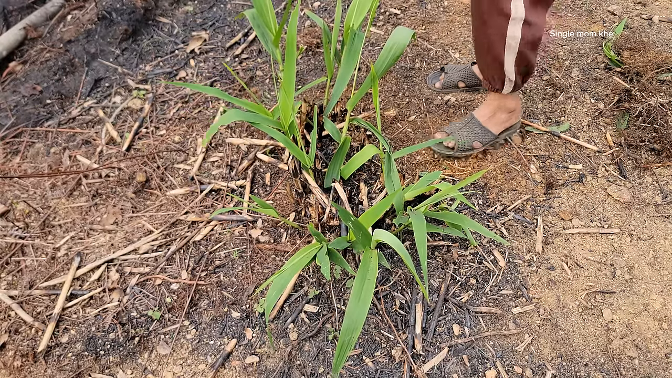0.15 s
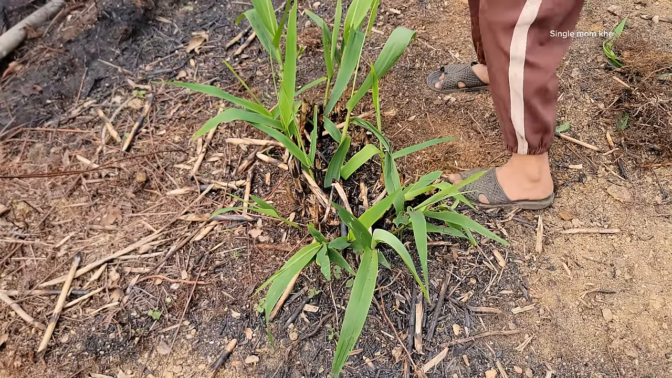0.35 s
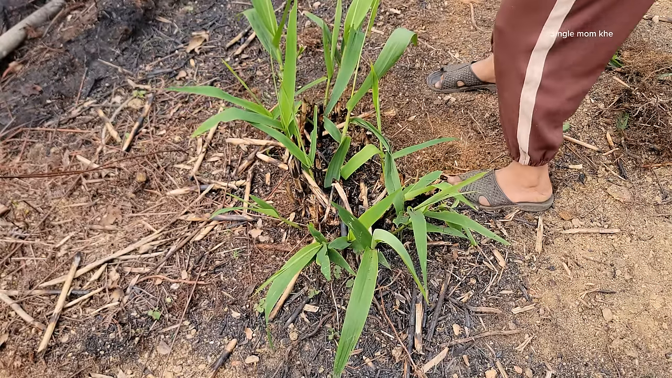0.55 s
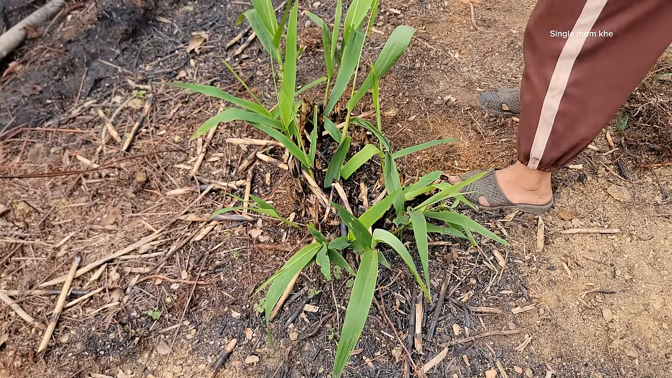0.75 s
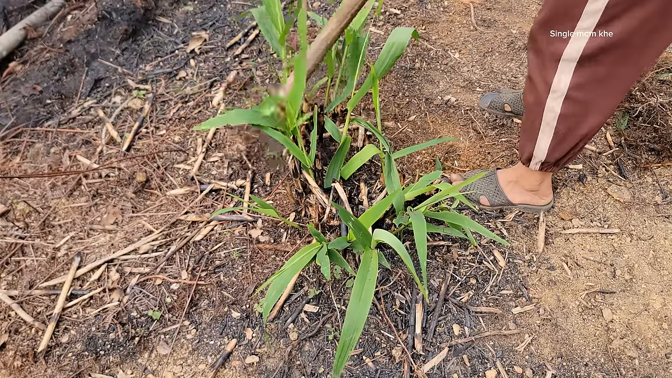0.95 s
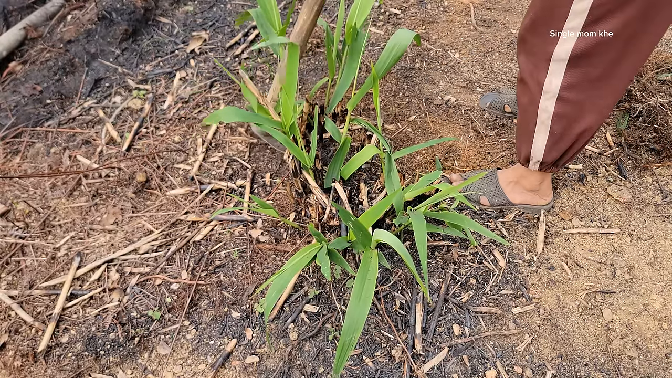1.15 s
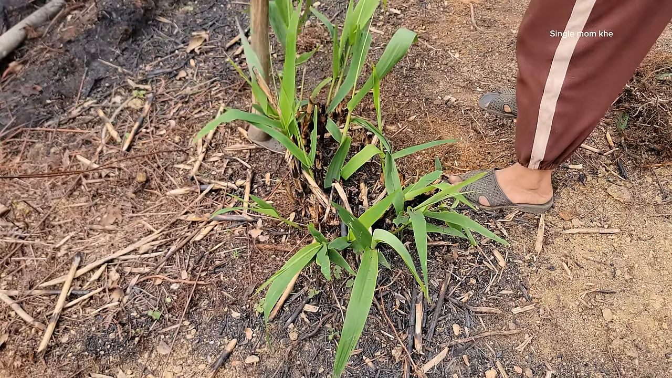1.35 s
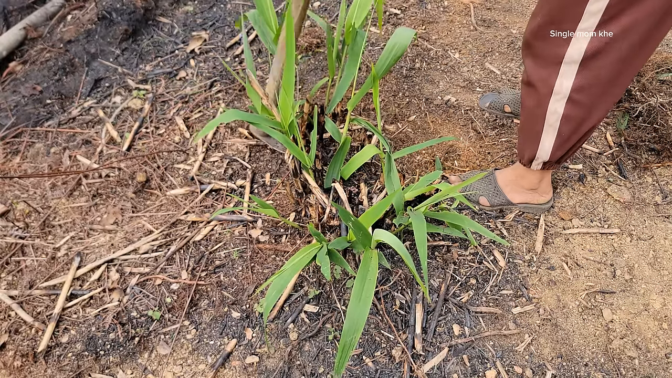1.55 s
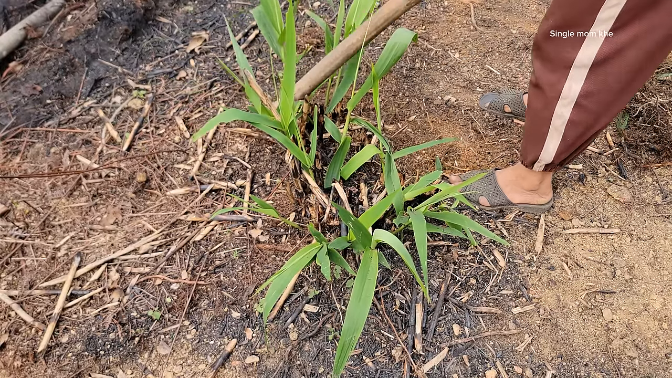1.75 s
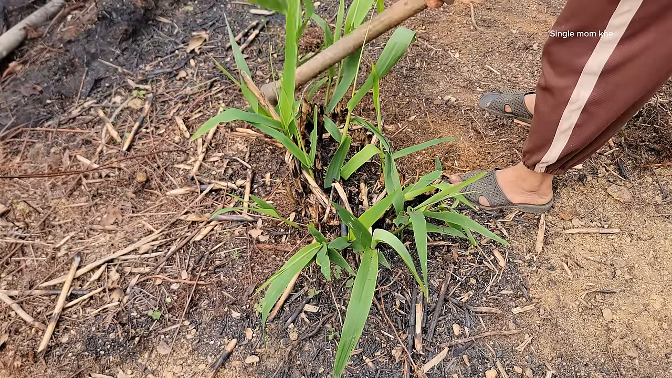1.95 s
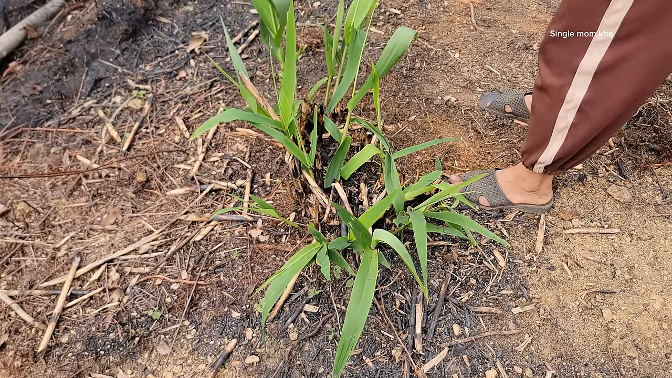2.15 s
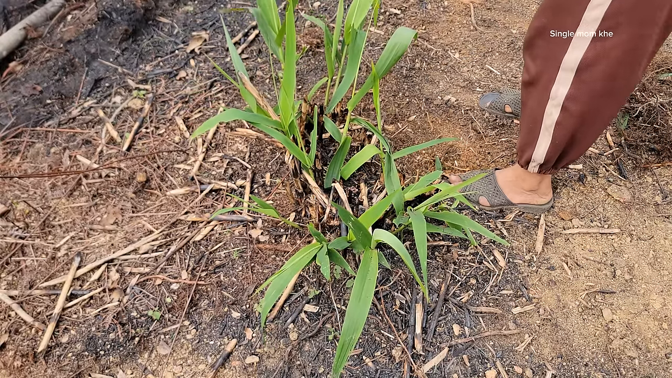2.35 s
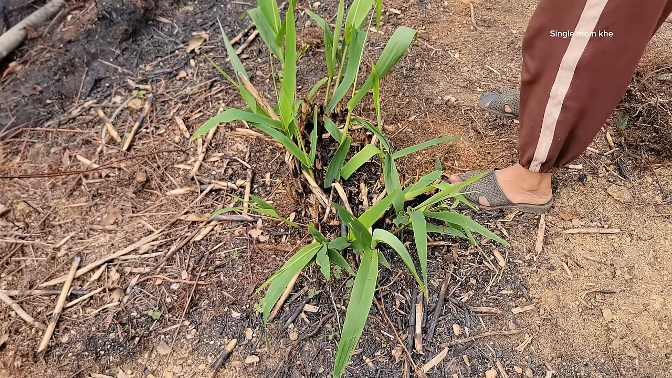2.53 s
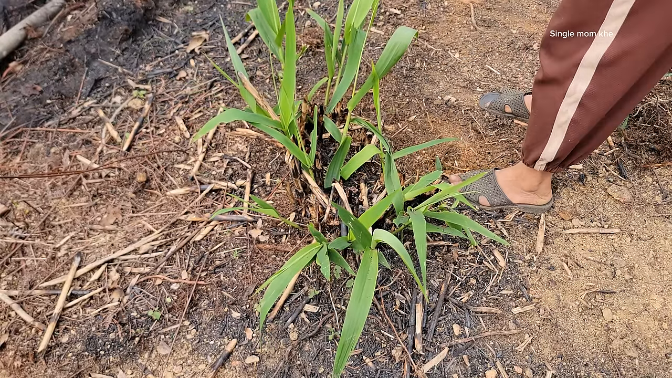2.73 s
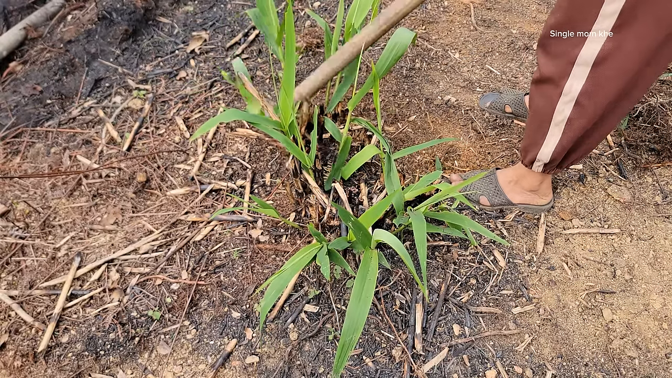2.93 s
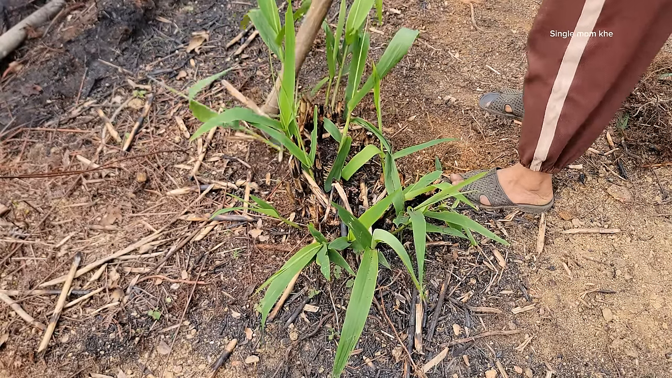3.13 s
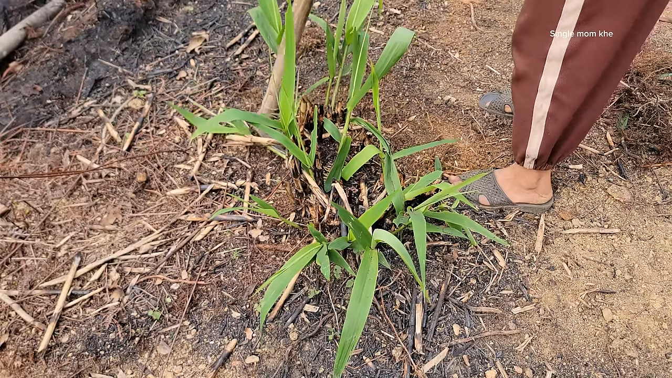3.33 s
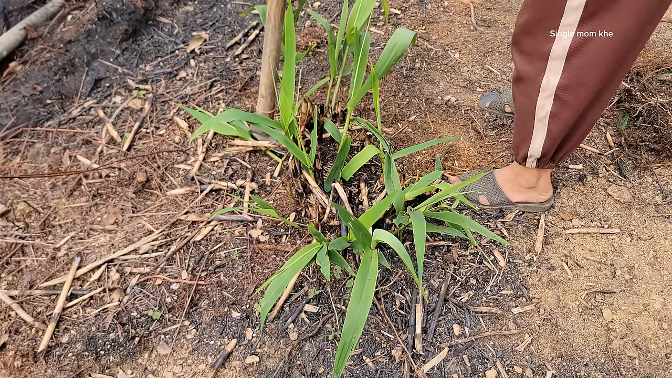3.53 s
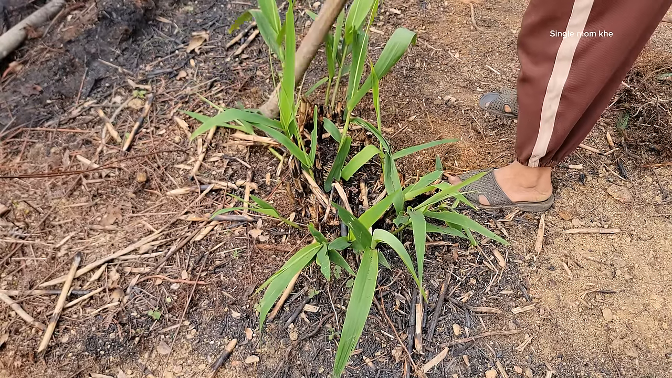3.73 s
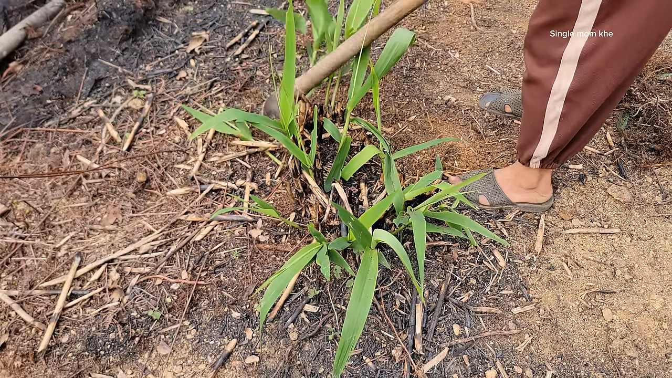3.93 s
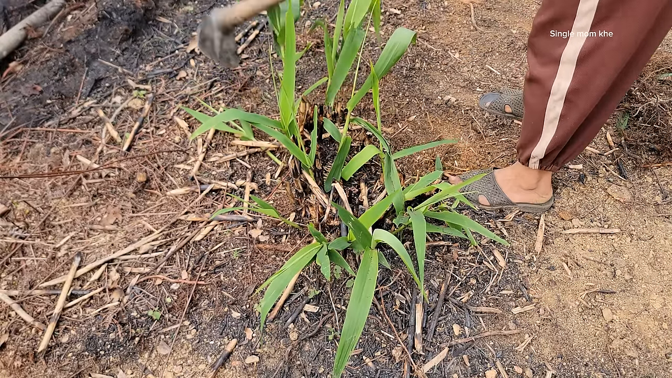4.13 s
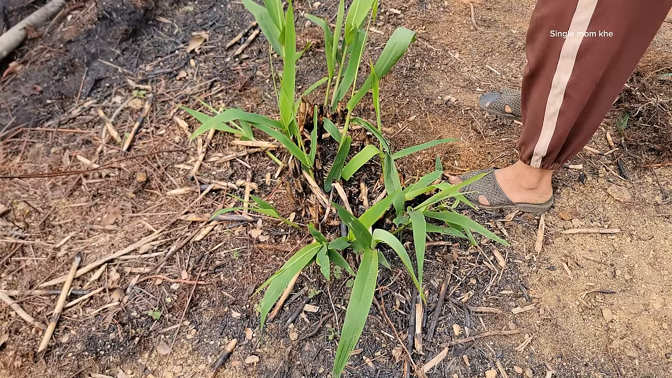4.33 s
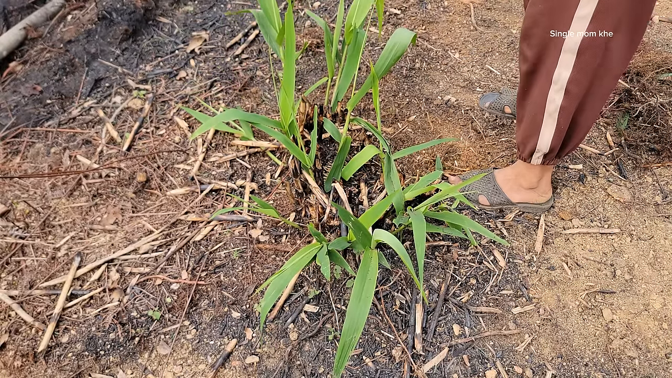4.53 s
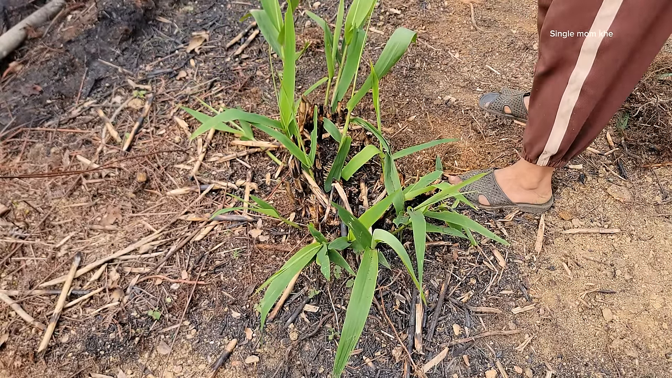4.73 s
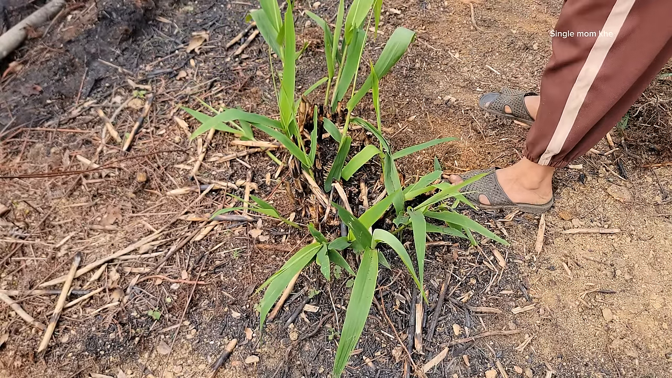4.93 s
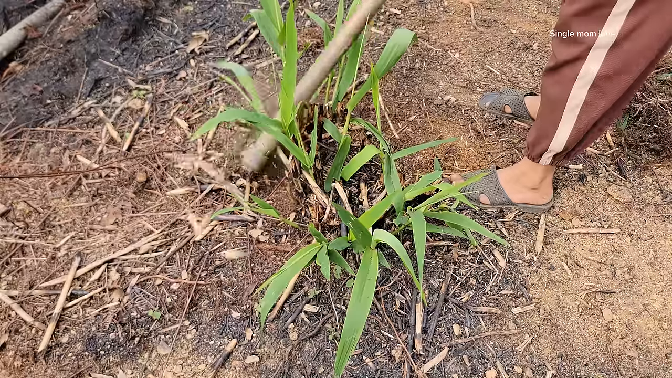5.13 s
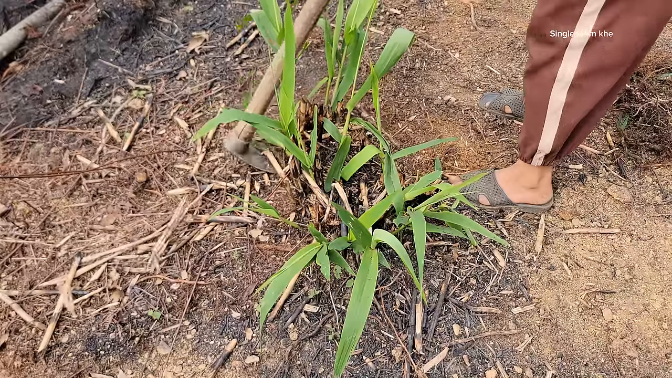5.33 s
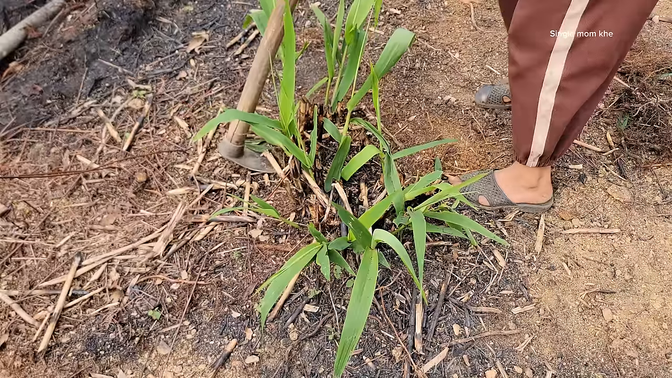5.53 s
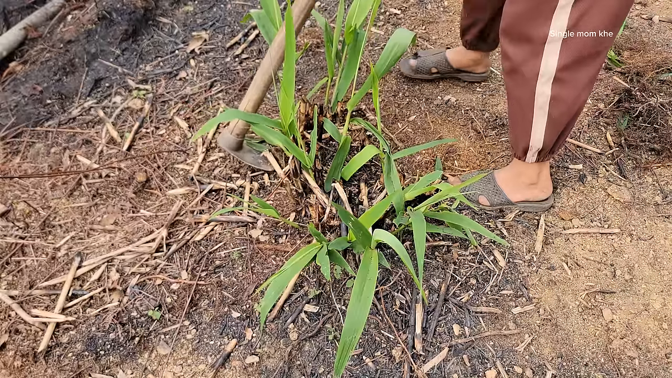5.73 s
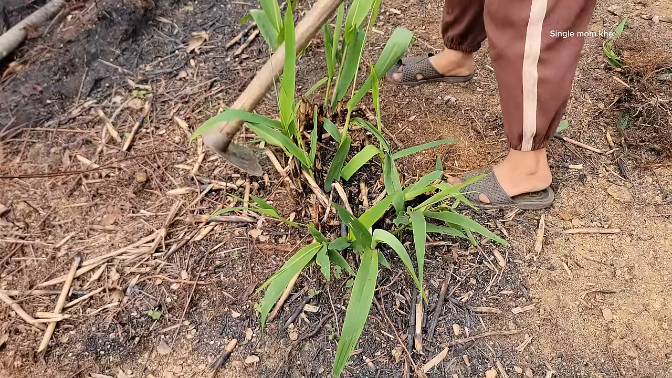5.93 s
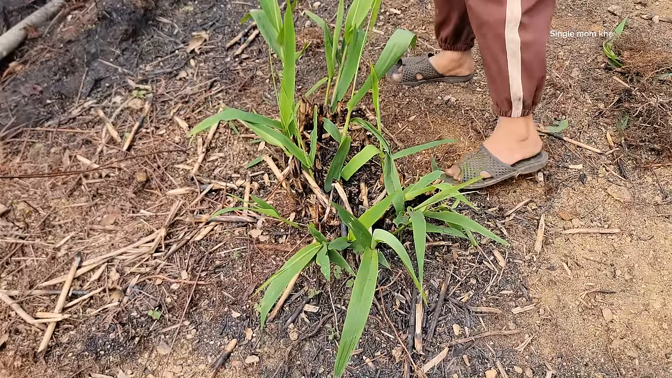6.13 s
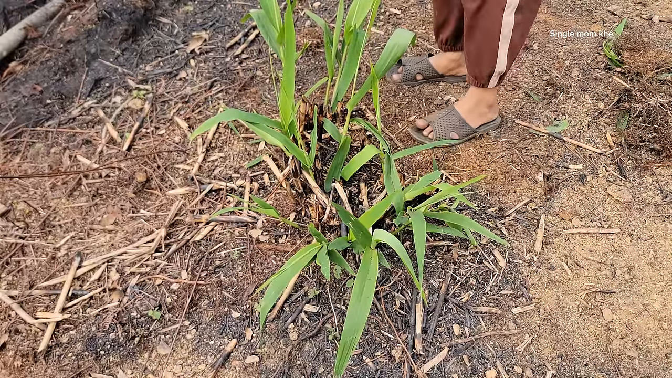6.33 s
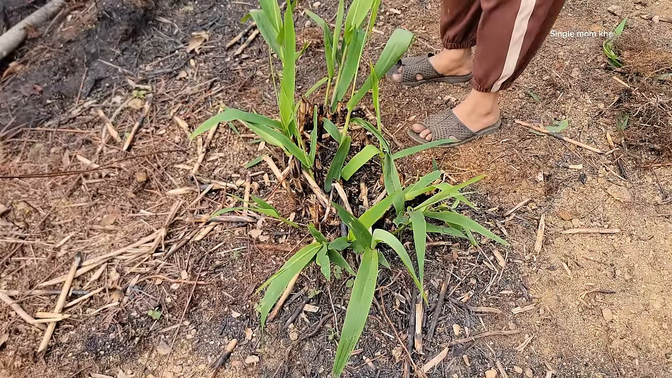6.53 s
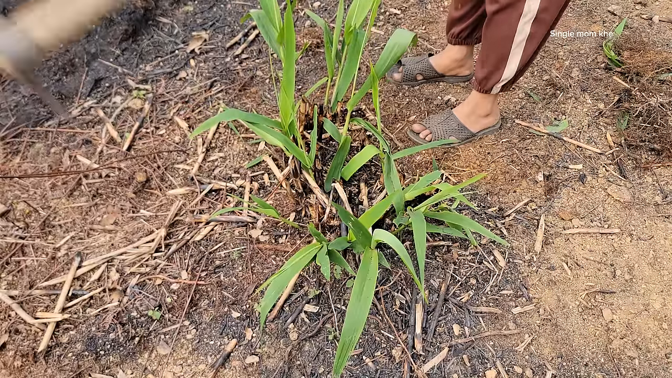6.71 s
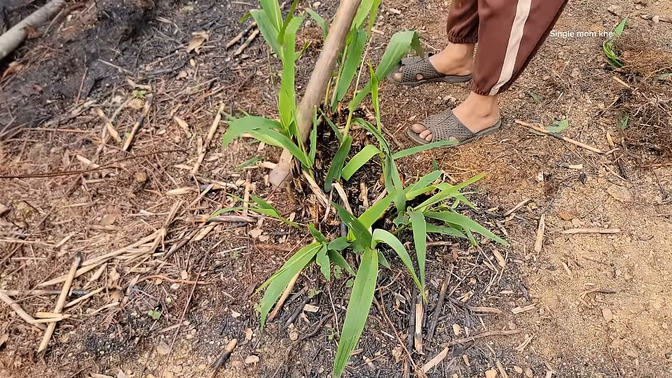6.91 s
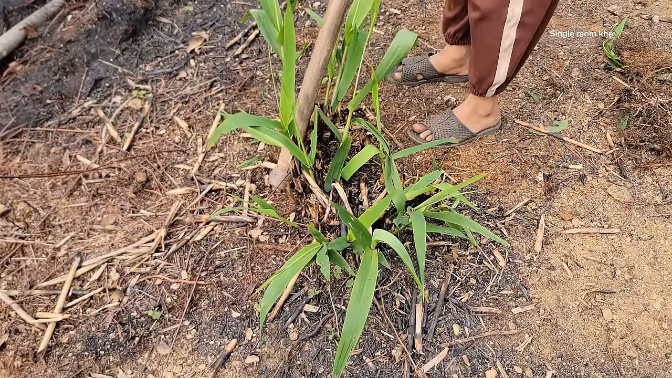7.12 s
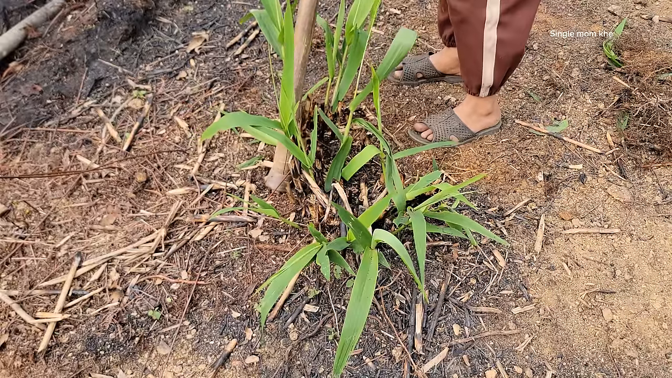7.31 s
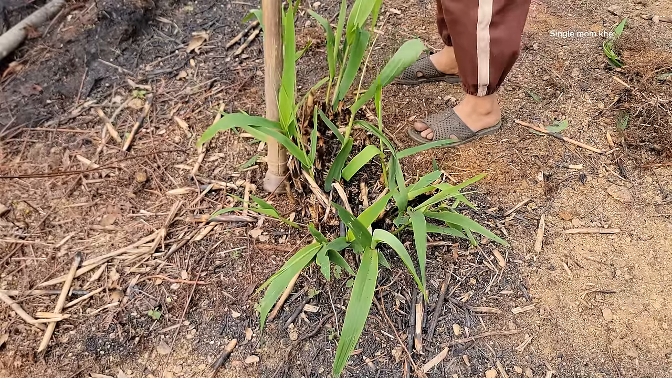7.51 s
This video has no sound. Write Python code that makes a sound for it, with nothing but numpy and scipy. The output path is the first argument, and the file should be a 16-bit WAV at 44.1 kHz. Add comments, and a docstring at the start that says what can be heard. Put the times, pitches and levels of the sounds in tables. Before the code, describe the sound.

Four crunchy, thudding hoe strikes in dry earth, with light scraping between them, over faint swelling cicadas and distant birds.

```python
"""Hoeing dry garden soil

A hoe chops four times into dry soil and is dragged back through crumbs and leaves. Each chop is
a crunch of breaking grit over a dull thud; between chops, clods tick and sandals scuff.
Cicadas click so fast that they buzz, in long swells that each climb from a lower note.
Small birds chirp far off, over a low hum and a light breeze."""
import sys
import numpy as np
from scipy import signal
from scipy.fft import rfft, irfft, next_fast_len
from scipy.io import wavfile
from scipy.ndimage import uniform_filter1d

SR = 44100
rng = np.random.default_rng(int(sys.argv[2]) if len(sys.argv) > 2 else 0)


def generate_wav(sig):
    """Save sig (samples, or channels by samples) to the path in sys.argv[1] as 16-bit PCM at SR."""
    pcm = np.round(np.clip(np.atleast_2d(sig).T, -1, 1) * 32767).astype(np.int16)
    wavfile.write(sys.argv[1], SR, pcm)


N = 333837
TIME = np.arange(N) / SR

# The tone of coarse crumbs of soil. Each row: frequency in Hz, relative level in dB.
CRUMB_TONE = [(250, -24), (550, -14), (800, -10.5), (1250, -2.5), (2200, -4.5), (3200, -1), (4500, -5.5),
              (7000, -12.5), (12000, -30), (16000, -38)]
# Soil thrown up by each chop. Each row: time in seconds, relative dB of crumbs, relative dB of dust.
THROWN_SOIL = [(.835, -52.5, -52), (2.93, -58, -60), (5.01, -53, -54), (6.78, -57, -57.5)]


def chops():
    """The blade bites several times in quick succession to make one chop, each in its own patch of earth."""
    # The blade biting the soil. Each row: peak time in seconds, level in dB, rise and decay in seconds,
    # treble tilt in dB per octave, pebble pitch in Hz, pebble level in dB relative to the grit.
    bites = [(0.8293, -9.5, .0004, 0.0014, -0.8, 3900, -9), (0.8358, -10, 0.0036, 0.001, -0.2, 2800, -11),
             (0.8395, -11.5, 0.0007, 0.0044, -0.76, 1350, -10),
             (.850, -33, 0.0031, 0.011, 1.5, 4000, -14.5), (2.928, -8, 0.0015, 0.0031, -0.85, 1286, -10),
             (2.9365, -24.5, .003, 0.01, 0.6, 530, -6), (5.0037, -7, 0.00017, 0.0016, 2.45, 1400, -12),
             (5.0090, -8, 0.0013, 0.0034, 0, 930, -17), (5.014, -13, 0.00032, 0.00099, 2.5, 3000, 4),
             (5.025, -28, 0.0062, 0.017, 0.7, 6500, -10.5),
             (5.0597, -36, 0.0035, 0.0048, -1.5, 1300, -12.5),
             (5.066, -23.5, 0.00088, 0.0024, 1.5, 4200, -4.5),
             (6.7586, -23, 0.00026, 0.00254, -2, 3000, -18),
             (6.7780, -12.5, 0.0029, 0.0047, -1.9, 1500, -16.5),
             (6.7820, -12, 0.00095, 0.0025, 3.5, 720, -10.5), (6.792, -32, 0.0033, 0.011, 1.5, 6500, -9)]
    # The tone of the four patches of earth. Each row: frequency in Hz, relative level in dB.
    first_patch = [(180, -41), (300, -9.5), (1080, -11), (1340, -7.5), (1750, -11.5), (1930, -6.5),
                   (2790, -6), (3640, -5), (4020, -1), (4590, -9.5), (5430, -4.5), (9710, -11),
                   (12700, -7.5), (16000, -17.5)]
    second_patch = [(180, -35), (300, -1.5), (398, -18.5), (555, -4.5), (946, -15.5), (1170, -9),
                    (1720, -6.5), (2250, -14.5), (2740, -3.5), (4020, -9.5), (4750, -6), (5160, -13),
                    (6620, -12.5), (16000, -21)]
    third_patch = [(180, -19.5), (300, -0.5), (379, -18.5), (930, -11), (1170, -22), (1360, -6.5),
                   (2070, -9.5), (3030, -4.5), (4230, -8), (4590, -8.5), (9240, -12.5), (9880, -15),
                   (12900, -13), (16000, -16)]
    fourth_patch = [(180, -35), (300, 0), (405, -18.5), (713, -9), (1250, -6.5), (1480, -11.5), (1870, -5),
                    (3030, -3), (3760, -2.5), (4230, -5), (5160, -6.5), (6520, -0.5), (8360, -9),
                    (16000, -11)]
    patches = first_patch, second_patch, third_patch, fourth_patch
    bites = np.array(bites)
    gaps_s = np.diff(bites[:, 0])
    blows = np.split(bites, np.flatnonzero(gaps_s > 1) + 1)
    return sum(crunch(blow, patch, spread_db=1.5, ring_db=3) for blow, patch in zip(blows, patches))


def crunch(contacts, soil_tone, spread_db, ring_db, size=12000):
    """Grit breaks while the blade moves and dies away as it stops; a struck pebble rings within it."""
    # Peaks and one hollow in the crunch. Each row: frequency in Hz, width in Hz, boost or cut in dB.
    blade_peaks = [(383, 60, -11.5), (513, 70, 2.5), (720, 90, 5.5), (1310, 40, 3.5), (2800, 200, 0.5),
                   (4304, 350, 2.5), (6525, 130, 1.5)]
    out, hz = np.zeros((2, N)), frequencies(size)
    soil_db = at_hz(soil_tone, hz) + sum(db * resonance(hz, f, width) for f, width, db in blade_peaks)
    for peak_s, db, rise_s, decay_s, tilt_db, pebble_hz, pebble_db in contacts:
        lead_s = min(4 * rise_s, .12)
        t = np.arange(size) / SR - lead_s
        envelope = np.exp(np.where(t < 0, -(t / rise_s) ** 2 / 2, -t / decay_s))
        tone = from_db(soil_db + tilt_db * np.log2(hz))
        grains = stereo(grit(size, spread_db), tone * chance_resonances(size, ring_db))
        pebble = stereo(grit(size, spread_db), resonance(hz, pebble_hz, pebble_hz * .13))
        add(out, peak_s - lead_s, from_db(db) * envelope * (grains + from_db(pebble_db) * pebble))
    return out


def grit(size, spread_db):
    """Two streams of tiny fractures; a larger spread makes their sizes more uneven."""
    return rng.standard_normal((2, size)) * from_db(spread_db * np.clip(rng.standard_normal(size), -3, 3))


def chance_resonances(size, depth_db, spacing_hz=170):
    """Every clod or stalk rings in its own way: a random gain for each frequency."""
    steps = frequencies(size) / spacing_hz
    return from_db(depth_db * np.interp(steps, np.arange(400), rng.standard_normal(400)))


def thuds(contact_s=.001, shudder_db=-17, low_cut_hz=48, size=12000):
    """The ground gives a few heavy bounces and shudders; the wooden handle bends and rings."""
    # The ground taking a blow. Each row: start in seconds, level in dB, pitch in Hz,
    # seconds to fade by 60 dB, handle level in dB.
    blows = [(.8365, -20, 85, .06, -26.5), (0.8471, -11.5, 138, .036, -39), (2.9282, -10, 92, 0.057, -18),
             (2.9371, -13, 125.9, .03, -36.5), (5.0064, -11, 98.2, 0.033, -19.5),
             (5.0145, -17.5, 170.2, .04, -33.5), (6.7760, -21, 114.4, 0.096, -29),
             (6.7767, -22.5, 235, 0.054, -42)]
    # The handle's own notes. Each row: pitch in Hz, relative level in dB, seconds to fade by 60 dB.
    handle_notes = [(120, -8.5, .13), (181, -2.5, 0.12), (240, -3, 0.069), (479, -8, 0.075)]
    out, t = np.zeros((2, N)), np.arange(size) / SR
    for start, db, hz, fade_s, handle_db in blows:
        shudder_tone = resonance(frequencies(size), hz, hz * 2.4)
        shudder = unit_level(irfft(rfft(rng.standard_normal((2, size))) * shudder_tone, size))
        ground = from_db(db - 60 * t / fade_s) * (np.sin(2 * np.pi * hz * t) + from_db(shudder_db) * shudder)
        handle = sum(from_db(handle_db + note_db - 60 * t / ring_s) * np.sin(2 * np.pi * note_hz * t)
                     for note_hz, note_db, ring_s in handle_notes)
        add(out, start, (ground + handle) * (1 - np.exp(-t / contact_s)))
    return signal.sosfilt(signal.butter(3, low_cut_hz, "high", fs=SR, output="sos"), out + 1e-18)


def scrapes():
    """The blade and sandals scuff the ground with a slower, softer crunch."""
    # Scuffs. Each row: peak time in seconds, level in dB, rise and decay in seconds,
    # treble tilt in dB per octave, pebble pitch in Hz, pebble level in dB relative to the grit.
    scuffs = [(.17, -63.5, 0.026, .02, 0.71, 1340, 1), (.745, -57, 0.016, 0.069, -4.94, 1700, -2),
              (1.925, -44.5, .022, 0.022, -0.67, 1920, -7.5), (1.949, -47.5, .008, 0.0069, -.8, 4200, 3.5),
              (4.48, -66, 0.027, 0.029, .5, 2822, 3.5), (5.254, -49.5, .015, 0.0091, 1.6, 2520, -13),
              (5.80, -61, 0.018, 0.015, -0.86, 1125, 4.5), (6.32, -60, .03, .025, -3.4, 2420, -8.5)]
    return crunch(scuffs, CRUMB_TONE, spread_db=5, ring_db=4)


def ticks(attack_s=.0002, decay_s=.0015, crumble_db=-23, crumble_s=.011, overtone=2.13, size=4096):
    """A sharp snap with a short crumble; big clods sound low, dry stalks high."""
    # Clods, twigs and stalks snapping. Each row: start in seconds, ring pitch in Hz,
    # then the thump, ring and crack levels in dB, before the boosts below.
    snaps = [(.396, 1400, -80, -79, -56.5), (.909, 1360, -60, -53.5, -64), (.964, 1500, -79, -50, -48),
             (1.01, 1280, -64, -38.5, -67), (1.25, 1360, -82, -48, -65), (1.275, 1400, -79, -61, -54),
             (1.324, 1360, -86, -50.5, -71), (1.348, 1400, -86, -56, -53), (1.674, 1600, -65, -51.5, -62),
             (1.74, 1600, -60, -47.5, -63), (1.944, 1800, -68, -47, -68), (2.016, 1900, -76, -54, -51),
             (2.862, 1500, -68, -65, -56), (3.24, 1400, -78, -61, -60.5), (3.466, 1360, -79.5, -58.5, -73),
             (3.946, 1400, -62, -49.5, -66), (4, 1600, -72, -45.5, -54), (4.644, 1100, -48, -62, -79),
             (4.69, 1100, -47, -61.5, -78), (5.141, 1400, -82, -59, -55), (5.327, 1400, -76.5, -64, -50),
             (5.365, 1900, -74, -53, -45), (5.781, 1300, -62, -57.5, -61), (5.816, 1250, -62, -55, -69),
             (5.931, 1650, -73.5, -48, -75), (6.323, 1250, -65.5, -60, -71), (7.227, 1500, -68, -56, -53),
             (7.33, 1200, -64, -55, -71), (7.5, 1300, -48, -42.5, -51), (7.534, 1400, -60, -58, -55)]
    boosts_db = np.array([4, 12.5, 11])
    out, hz, t = np.zeros((2, N)), frequencies(size), np.arange(size) / SR
    fade = np.exp(-t / decay_s) + from_db(crumble_db) * np.exp(-t / crumble_s)
    envelope = fade * (1 - np.exp(-t / attack_s))
    thump = resonance(hz, 510, 200)
    crack = resonance(hz, 8600, 9800) * hz / (hz + 3000)
    bass_cut = hz ** 2 / (hz ** 2 + 800 ** 2)
    for start, pitch, *levels_db in snaps:
        ring = (resonance(hz, pitch, 350) + resonance(hz, pitch * overtone, 950)) * bass_cut
        own_tone = chance_resonances(size, depth_db=5)
        snap = sum(from_db(db) * stereo(grit(size, spread_db=2.4), tone * own_tone)
                   for db, tone in zip(boosts_db + levels_db, (thump, ring, crack)))
        add(out, start, envelope * snap)
    return out


def taps(width_hz=90, overtone=1.7, overtone_db=-13, size=12000):
    """Soft, rubbing contacts sound through a hollow note and its overtone."""
    # Hollow knocks. Each row: peak time in seconds, level in dB, pitch in Hz, rise and fall in seconds.
    knocks = [(2.317, -67, 576, 0.0081), (2.638, -66.5, 570, 0.024), (2.979, -52.5, 560, .005),
              (4.403, -65.5, 620, 0.011), (4.553, -63, 564, 0.0049), (4.648, -49.5, 542, 0.0042),
              (4.695, -50.5, 570, 0.0025), (5.691, -66.5, 622, 0.04), (5.913, -63.5, 617, 0.0094),
              (6.181, -64, 598, 0.028), (6.537, -66.5, 601, .025), (7.334, -50.5, 643, 0.0011),
              (7.5043, -34.5, 520, 0.0007), (7.5193, -41.5, 530, 0.00087)]
    out, hz = np.zeros((2, N)), frequencies(size)
    t = (np.arange(size) - size // 2) / SR
    for peak_s, db, pitch, touch_s in knocks:
        upper_note = from_db(overtone_db) * resonance(hz, pitch * overtone, width_hz * 2)
        hollow = stereo(rng.standard_normal((2, size)), resonance(hz, pitch, width_hz) + upper_note)
        touch = 1 / np.cosh(np.clip(t / touch_s * .86, -20, 20))
        add(out, peak_s + t[0], from_db(db) * unit_level(hollow * touch) * np.sqrt(np.mean(touch ** 2)))
    return out


def blade_ring(start_s=4.012, hz=1110, level_db=-53, fade_s=.39, attack_s=.0067):
    """Pulled clear of the soil, the steel blade sings briefly."""
    t = np.maximum(TIME - start_s, 0)
    return from_db(level_db - 60 * t / fade_s) * np.sin(2 * np.pi * hz * t) * (1 - np.exp(-t / attack_s))


def loose_soil(dust_boost_db=3.5, clump_db=2.03):
    """Crumbs roll and leaves brush in clumps of small grains, with dry crackles among them."""
    # The tone of fine dust. Each row: frequency in Hz, relative level in dB.
    dust_tone = [(2000, -19.5), (4500, 1.5), (7500, 3.5), (10000, -1.5), (15500, -2.5)]
    crumb_motion, dust_motion = soil_motion()
    grains = unit_level(grit(N, spread_db=3.5) * from_db(clump_db * slow_noise(60)[0].real))
    grains += .7 * crackles(per_second=380)
    crumbs = stereo(grains, from_db(at_hz(CRUMB_TONE, frequencies(N))))
    dust = stereo(grains, from_db(at_hz(dust_tone, frequencies(N))))
    return crumb_motion * crumbs + dust_motion * from_db(dust_boost_db) * dust


def soil_motion(throw_s=.017, crumb_settle_db_per_s=44, dust_settle_db_per_s=56):
    """How strongly crumbs and dust move: thrown soil settles, dragged soil moves while the stroke lasts."""
    # A blade or sandal dragged through crumbs and leaves.
    # Each row: start in seconds, length in seconds, relative dB of crumbs, relative dB of dust.
    drags = [(0, .79, -76, -79), (.32, .04, -64, -74), (.375, .03, -70, -61), (1.22, .1, -61.5, -66),
             (1.56, .05, -65, -75), (1.67, .19, -67, -76), (1.895, .05, -53, -55), (2, .2, -70, -75),
             (2.28, .06, -67, -68), (2.4, .04, -65, -74), (2.89, .03, -66, -78), (3.33, .12, -70, -78),
             (3.59, .13, -67, -75), (3.86, .11, -59, -72), (3.99, .04, -59, -62), (4.06, .06, -66, -72),
             (4.16, .35, -74, -76), (4.56, .1, -74, -96), (5.24, .14, -65, -58.5), (5.44, .27, -71, -72),
             (5.785, .11, -67, -73), (5.95, .3, -77.5, -83), (6.28, .06, -66, -78), (6.38, .32, -76, -99),
             (7.16, .08, -64, -66), (7.27, .06, -67, -80), (7.37, .11, -68.5, -73), (7.505, .02, -52, -68)]
    crumb_power, dust_power = np.zeros((2, N))
    for start, crumb_db, dust_db in THROWN_SOIL:
        thrown = held(start, np.inf, throw_s, throw_s)
        age = np.maximum(TIME - start, 0)
        crumb_power += (thrown * from_db(crumb_db - crumb_settle_db_per_s * age)) ** 2
        dust_power += (thrown * from_db(dust_db - dust_settle_db_per_s * age)) ** 2
    for start, length, crumb_db, dust_db in drags:
        stroke = held(start, start + length, attack_s=.018, release_s=.02)
        crumb_power += (stroke * from_db(crumb_db)) ** 2
        dust_power += (stroke * from_db(dust_db)) ** 2
    return np.sqrt(crumb_power), np.sqrt(dust_power)


def crackles(per_second, base_cycles=14, pitch_count=24):
    """Dry bits break at random, each ringing very briefly at one of many pitches."""
    out = np.zeros((2, N))
    for hz in np.geomspace(1000, 15000, pitch_count):
        breaks = rng.integers(0, N, int(per_second * N / SR / pitch_count))
        clicks = np.zeros((2, N))
        clicks[:, breaks] = rng.standard_normal((2, len(breaks)))
        ring_cycles = base_cycles + hz / 1000
        decay, angle = from_db(-60 * hz / (ring_cycles * SR)), 2 * np.pi * hz / SR   # per sample
        ringing = signal.lfilter([np.sin(angle)], [1, -2 * decay * np.cos(angle), decay ** 2], clicks + 1e-18)
        out += unit_level(ringing) * np.sqrt(hz)
    return unit_level(out)


def cicadas(opening_hz=4190, full_hz=5440, click_hz=350, buzz_depth=.56, focus_db_per_hz=.008):
    """Tymbals, the cicada's tiny drums, click fast; its body rings, narrow and low at first, then higher."""
    # The bands the body rings in. Each row: multiple of the pitch, width in Hz, relative level in dB.
    body_bands = [(.96, 230, -8.5), (1, 140, -3.5), (1.005, 60, -6), (1.115, 430, -4.5)]
    # The broad rasp of the clicks. Each row: frequency in Hz, relative level in dB.
    rasp_tone = [(600, -14), (1300, 5.5), (2800, 6.5), (8000, 3.5), (10000, -1), (16000, -1)]
    strength, climb = cicada_swells()
    phase = 2 * np.pi * np.cumsum(opening_hz + (full_hz - opening_hz) * climb) / SR
    song = np.zeros((2, N))
    for multiple, width_hz, db in body_bands:
        gain = from_db(db - focus_db_per_hz * width_hz * (1 - climb))   # wide bands start weaker
        song += gain * (slow_noise(width_hz) * np.exp(1j * multiple * phase)).real
    song = song - .26 * song[::-1]   # from the side, the two microphones lie half a wave apart
    click_rate = click_hz * (1 + .01 * slow_noise(3)[0].real)
    clicks = 1 + buzz_depth * np.cos(2 * np.pi * np.cumsum(click_rate) / SR)
    rasp = from_db(-19) * shaped_noise(rasp_tone)
    lean_right = from_db([[-2.25], [2.25]])
    return strength * (unit_level(song * clicks) * lean_right + rasp)


def cicada_swells(climb_middle_s=.24, climb_s=.13, dip_db=1.2):
    """The song's strength, which dips as the note climbs, and how far the note has climbed (0 to 1)."""
    # Swells of song. Each row: start in seconds, end in seconds, level in dB.
    swells = [(-1, 2.22, -56.6), (2.9, 4.19, -57), (4.9, 6.16, -58.4), (6.78, 8, -56.8)]
    strength, climb = np.zeros((2, N))
    for start, end, db in swells:
        swell = from_db(db) * held(start, end, attack_s=.08, release_s=.115)
        rise = (1 + np.tanh((TIME - start - climb_middle_s) / climb_s)) / 2
        climb = np.where(swell > strength, rise, climb)   # the loudest swell sets the note
        strength = np.maximum(strength, swell)
    return strength * from_db(-dip_db * np.sin(np.pi * climb)), climb


def birds(length_s=.085, waver_hz=65, far_db=-76, far_fall_hz=1350, far_count=56):
    """Thin whistles fall faster towards their end; more of the flock chirps at random farther off."""
    # Nearer chirps. Each row: start in seconds, starting pitch in Hz, fall in Hz, level in dB.
    chirps = [(.09, 4320, 1050, -68), (.2, 4450, 1200, -69), (.45, 4270, 1000, -68), (.59, 4330, 900, -71),
              (2.47, 4690, 1400, -76), (3.32, 3560, 750, -69), (3.7, 4420, 1150, -67),
              (4.19, 4390, 1200, -60.5), (4.55, 4600, 1200, -65), (5.388, 4720, 720, -54.5),
              (6.39, 4420, 1300, -64.5), (6.57, 4350, 1200, -62.5), (6.63, 4370, 950, -67),
              (7.02, 4340, 1300, -63), (7.135, 4410, 480, -53.5)]
    flock = [(when * N / SR, 3800 + 750 * height, far_fall_hz, far_db)
             for when, height in rng.random((far_count, 2))]
    out, progress = np.zeros((2, N)), np.linspace(0, 1, int(length_s * SR))
    envelope = np.sqrt(np.abs(np.sin(np.pi * progress)))
    for start, start_hz, fall_hz, db in list(chirps) + flock:
        waver = waver_hz * unit_level(uniform_filter1d(rng.standard_normal(len(progress)), size=150))
        phase = 2 * np.pi * np.cumsum(start_hz - fall_hz * progress ** 1.9 + waver) / SR
        add(out, start, from_db(db) * envelope * np.sin([phase, phase + rng.uniform(-2, 2)]))
    return out + garden_echo(out, level_db=-9, fade_s=.3)


def garden_echo(sound, level_db, fade_s, size=22050):
    """Plants and the slope scatter a faint echo with little bass."""
    tail = rng.standard_normal((2, size)) * from_db(-60 * np.arange(size) / SR / fade_s)
    tail = signal.sosfilt(signal.butter(1, [700, 7000], "band", fs=SR, output="sos"), tail)
    return from_db(level_db) * signal.fftconvolve(sound, unit_level(tail) / np.sqrt(size), axes=1)[:, :N]


def breeze(gust_db=4.5, swing_db=-58, swing_s=.1):
    """An uneven breeze rumbles on the microphones, with a puff from every swing of the hoe."""
    # The strength of the breeze. Each row: time in seconds, level in dB.
    breeze_levels = [(0, -63), (1.1, -56), (1.7, -68), (2.6, -67), (3.3, -72), (5.85, -75), (6.02, -60),
                     (7.15, -59), (7.57, -71)]
    # The tone of its rumble. Each row: frequency in Hz, relative level in dB.
    wind_tone = [(18, -7), (45, -1.5), (80, 0), (130, -11), (220, -30), (500, -49.5)]
    times, levels_db = np.transpose(breeze_levels)
    puffs = sum(held(chop_s, chop_s, swing_s, swing_s) for chop_s, *_ in THROWN_SOIL)
    flow = from_db(np.interp(TIME, times, levels_db)) + from_db(swing_db) * puffs
    gusts = unit_level(from_db(gust_db * slow_noise(33)[0].real))
    return flow * gusts * shaped_noise(wind_tone)


def open_air(level_db=-73):
    """The faint, steady hush of the outdoors."""
    # The tone of the hush. Each row: frequency in Hz, relative level in dB.
    air_tone = [(20, 2.5), (150, 1.5), (210, -5.5), (290, 6.5), (400, -14), (550, 3), (800, -10),
                (1400, -14), (2400, -16), (3800, -6), (5500, -9), (6800, -13.5), (8300, -3), (9200, -24.5),
                (16000, -24)]
    return from_db(level_db) * shaped_noise(air_tone)


def far_hum(hz=95, level_db=-69):
    """One low note wavers in the distance."""
    waver = 1 + .35 * slow_noise(14)[0]
    return from_db(level_db) * unit_level((waver * np.exp(2j * np.pi * hz * TIME)).real)


def stereo(streams, tone, right_delay_s=.00006):
    """Give two streams a tone and hear them on two microphones, alike in the bass, at an average level of 1."""
    # How alike left and right sound. Each row: frequency in Hz, likeness from 0 to 1.
    likeness = [(100, 0.85), (700, 0.75), (2000, 0.55), (5000, 0), (10000, 0.3)]
    size = streams.shape[1]
    padded = next_fast_len(size, True)
    hz = frequencies(padded)
    middle, side = rfft(streams, padded) * np.interp(hz, frequencies(size), tone)
    alike = np.clip(at_hz(likeness, hz), 0, 1)
    middle, side = middle * np.sqrt(1 + alike), side * np.sqrt(1 - alike)
    left = middle + side
    right = (middle - side) * np.exp(-2j * np.pi * hz * right_delay_s)
    return unit_level(irfft([left, right], padded)[:, :size])


def shaped_noise(tone_table):
    """Steady stereo noise with the tone that a table gives."""
    return stereo(rng.standard_normal((2, N)), from_db(at_hz(tone_table, frequencies(N))))


def slow_noise(width_hz, step=8):
    """A random stereo wobble in complex numbers, drawn every few samples; a wider band wobbles faster."""
    lowpass = signal.butter(4, width_hz * step, fs=SR, output="sos")
    slow = signal.sosfilt(lowpass, rng.standard_normal((4, N // step + 2)))
    slow = unit_level(slow[:2]) + 1j * unit_level(slow[2:])
    return np.array([np.interp(np.arange(N) / step, np.arange(len(side)), side) for side in slow])


def held(start, end, attack_s, release_s):
    """A loudness curve that swells to 1 by the start, holds, and fades after the end."""
    outside = np.maximum(start - TIME, 0) / attack_s + np.maximum(TIME - end, 0) / release_s
    return np.exp(-np.minimum(outside, 10) ** 2 / 2)


def resonance(hz, centre_hz, width_hz):
    """A gain of 1 at the centre frequency that falls away on both sides."""
    return 1 / (1 + ((hz - centre_hz) / width_hz) ** 2 * 2)


def at_hz(table, hz):
    """Read between a table's rows, with octaves evenly spaced."""
    table_hz, values = np.transpose(table)
    return np.interp(np.log(hz), np.log(table_hz), values)


def frequencies(size):
    """The frequencies in the spectrum of this many samples, never below 1 Hz."""
    return np.maximum(np.arange(size // 2 + 1) * SR / size, 1)


def from_db(db):
    """Turn decibels into a gain."""
    return 10 ** (np.asarray(db) / 20)


def unit_level(sound):
    """Scale a sound to an average (root mean square) level of 1."""
    return sound / np.sqrt(np.mean(sound ** 2) + 1e-20)


def add(out, start_s, sound):
    """Mix a sound in from its start time on."""
    start = max(round(start_s * SR), 0)
    out[..., start:start + sound.shape[-1]] += sound[..., :N - start]


def scene():
    """The hoe works close by, with cicadas, birds and the breeze behind it."""
    hoe = (chops() + scrapes() + ticks()) * from_db([[-.6], [.6]])
    echo = garden_echo(hoe, level_db=-36.5, fade_s=.56)
    digging = hoe + echo + thuds() + taps() + blade_ring() + loose_soil()
    return digging + cicadas() + birds() + breeze() + open_air() + far_hum()


def record(dry, ceiling=1.2, cutoff_hz=16000):
    """The loudest peaks are rounded off and the highest treble is cut."""
    rounded = ceiling * np.tanh(dry / ceiling)
    return signal.sosfilt(signal.ellip(10, .1, 80, cutoff_hz, fs=SR, output="sos"), rounded)


dry = scene()
out = record(dry)
generate_wav(out)
```